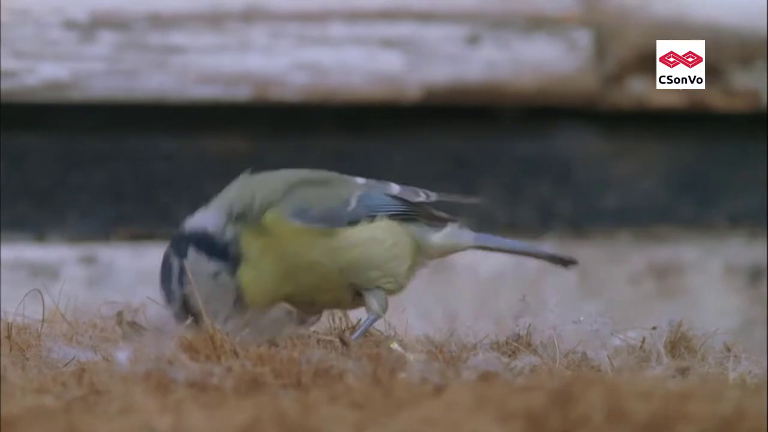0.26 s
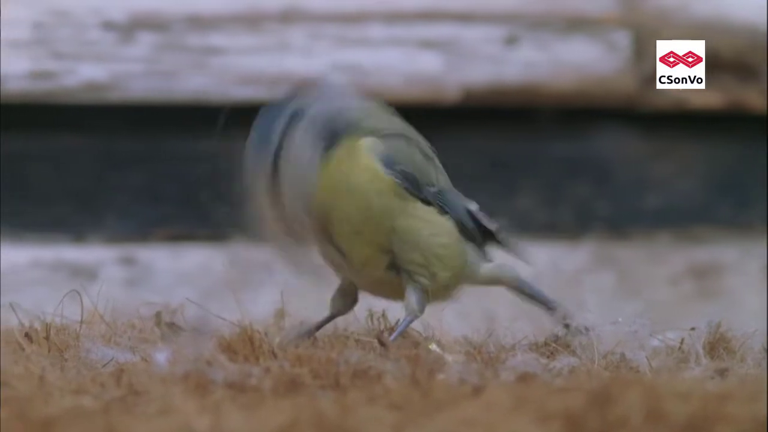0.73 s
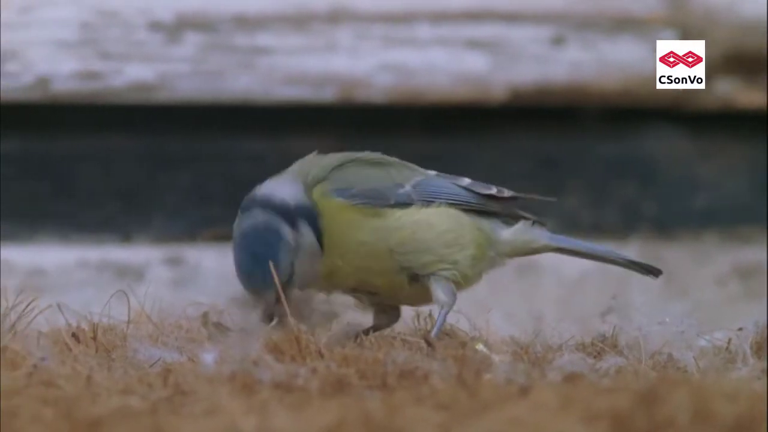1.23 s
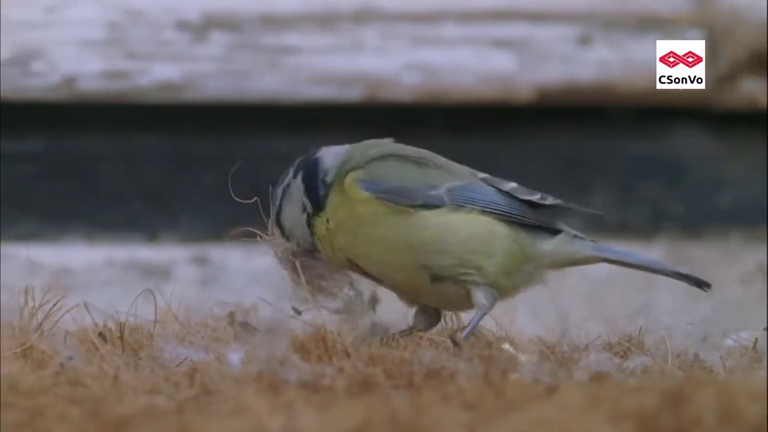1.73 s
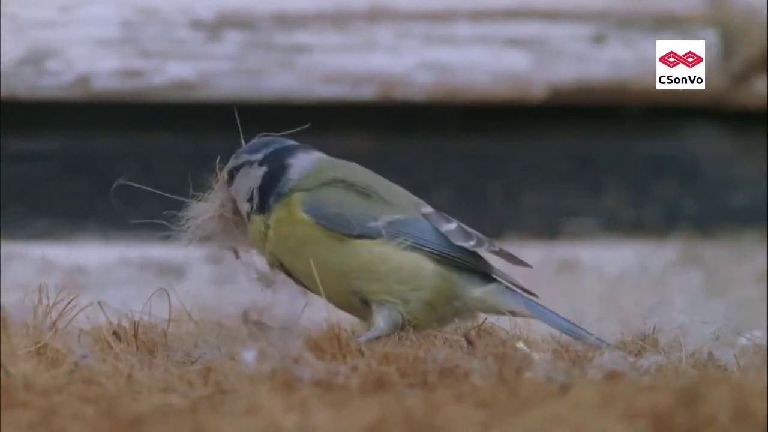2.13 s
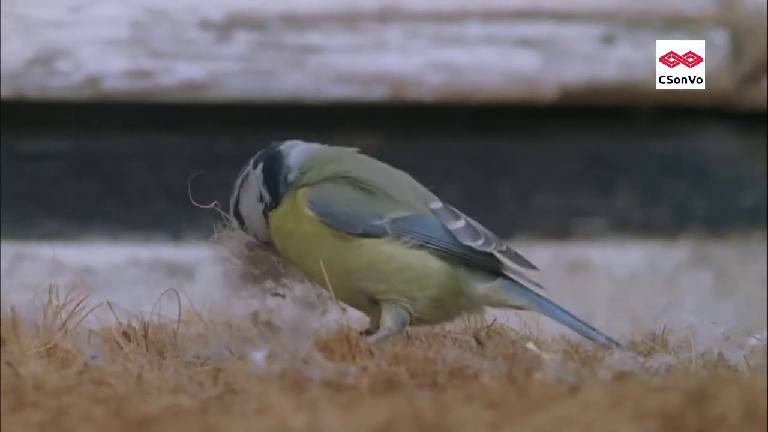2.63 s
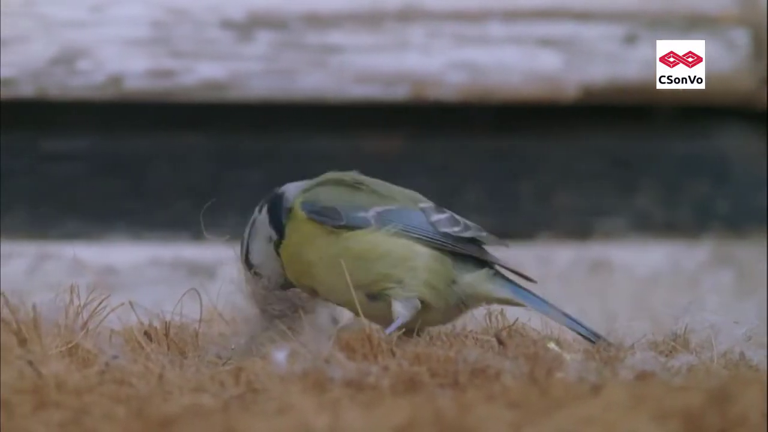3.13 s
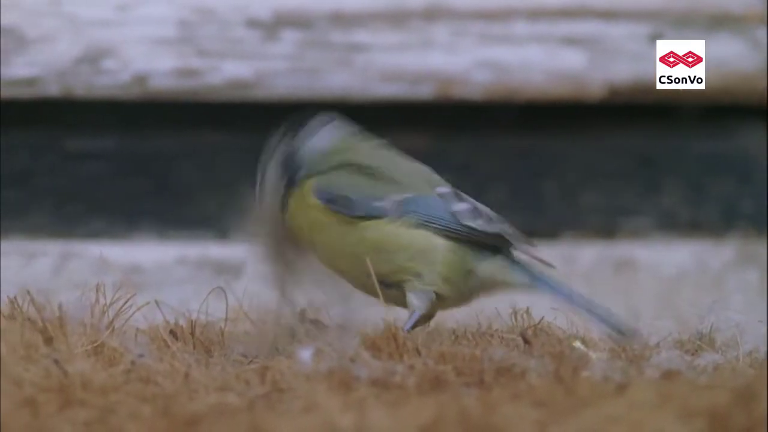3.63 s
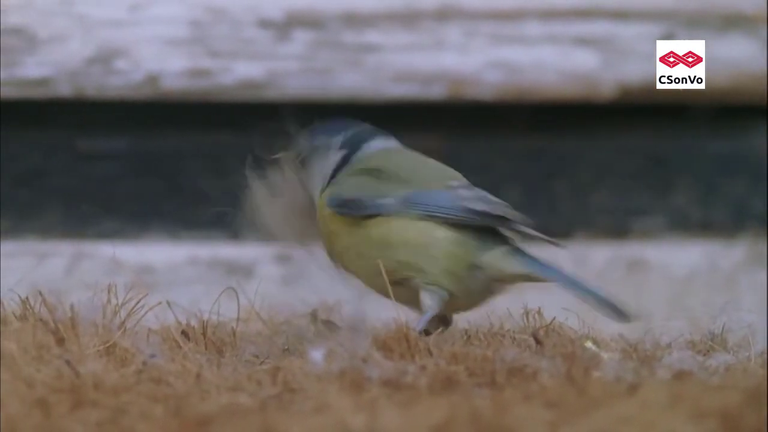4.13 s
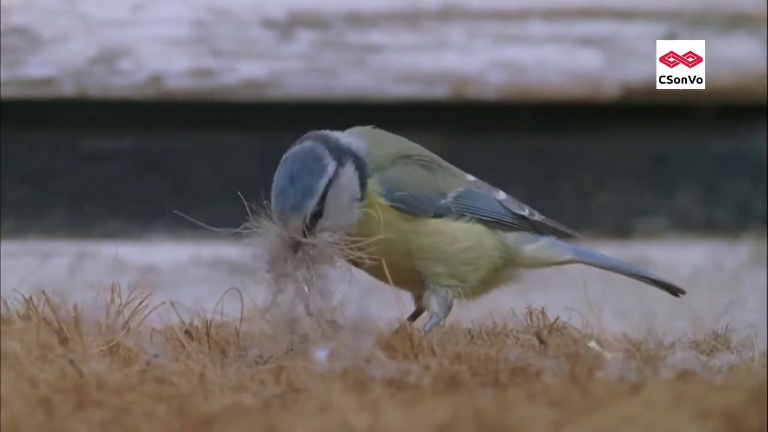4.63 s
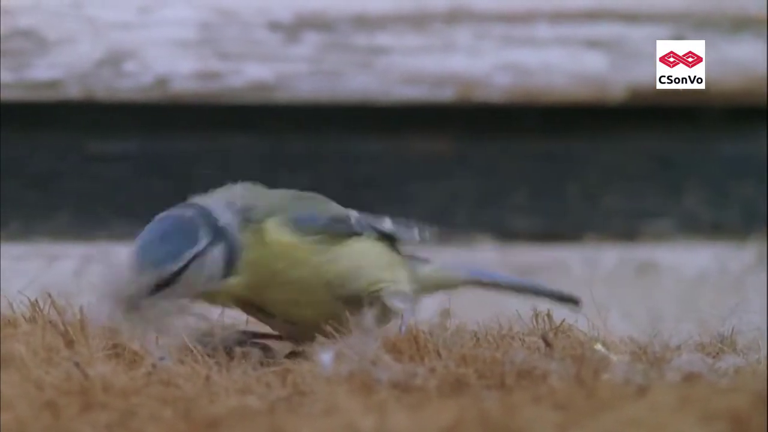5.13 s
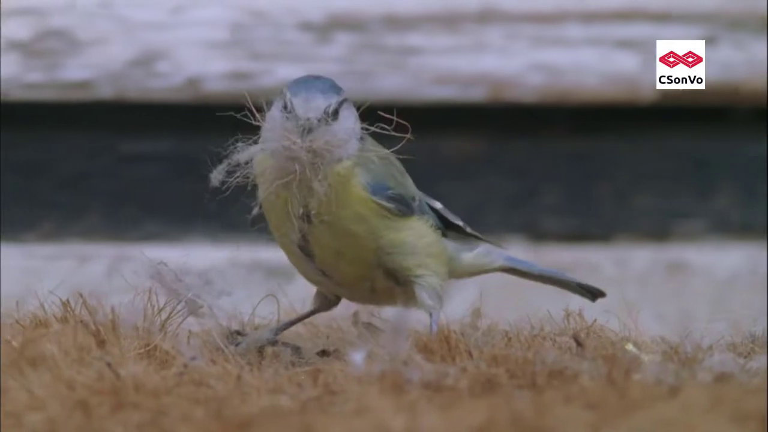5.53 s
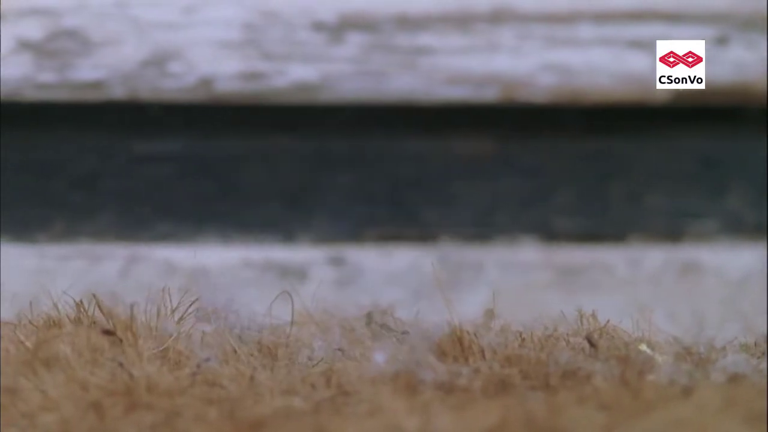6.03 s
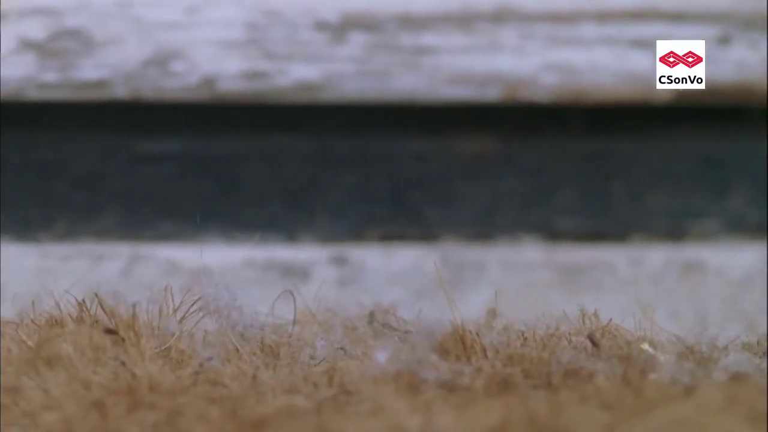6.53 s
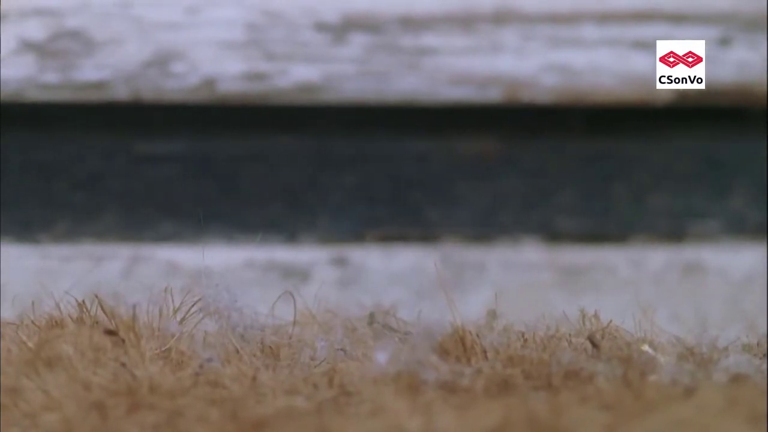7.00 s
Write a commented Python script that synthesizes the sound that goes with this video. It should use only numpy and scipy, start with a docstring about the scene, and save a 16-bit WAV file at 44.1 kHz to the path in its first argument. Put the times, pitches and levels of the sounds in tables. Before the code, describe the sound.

A close tit sings two phrases of clear paired whistles, high arched notes then lower sagging ones, over faint distant birdsong in a quiet garden.

```python
"""Garden: a tit close by sings two phrases of paired whistles, arched high notes, then sagging low ones.
Walls throw two echoes back. The whistles are near-pure gliding tones with weak harmonics.
Farther off a second tit see-saws and a small bird repeats falling sweeps (gliding sines), sparrows chirp
(harmonics through a beak resonance) and a bird rattles (pulsed noise); a blur of far birds lies behind.
A thin garden hiss, cut below 950 Hz, lies over the recorder's own low noise and hum."""
import sys
import numpy as np
from scipy import signal
from scipy.fft import rfft, irfft, next_fast_len
from scipy.io import wavfile
from scipy.ndimage import uniform_filter1d, map_coordinates

SR = 44100
rng = np.random.default_rng(int(sys.argv[2]) if len(sys.argv) > 2 else 0)


def materialize(psi):
    """Save the field psi as 16-bit PCM at rate SR to the path in sys.argv[1].

    A 1-D psi becomes a single channel; in a 2-D psi each row is a channel.
    """
    bounded = np.clip(np.atleast_2d(psi).T, -1, 1)
    quanta = np.round(bounded * 32767).astype(np.int16)
    wavfile.write(sys.argv[1], SR, quanta)


N = 320166
TIME = np.arange(N) / SR

# Pitch shapes of repeated far notes. Each row: time from the note's start in seconds, pitch in Hz.
# long falling sweep
SWEEP = [(0, 7166), (.012, 5766), (.035, 4394), (.065, 3610), (.085, 2950), (.095, 2926)]
# short falling note between sweeps
SLIDE = [(0, 6070), (.03, 5540), (.05, 5400)]
# hooked trill note, up then down
HOOK = [(0, 3727), (.017, 4550), (.03, 3800), (.048, 3144)]
# steep high fall
FLICK = [(0, 7500), (.022, 5320)]
# quick low fall
DROP = [(0, 3225), (.012, 2770), (.024, 2050)]
# Recorder noise spectrum. Each row: frequency in Hz, relative density in dB per Hz.
CIRCUIT = [(8, 14.5), (25, 6.5), (48, -15.5), (62, -5), (76, -8.5), (160, -12.5), (250, -14), (400, -13),
           (600, -20), (850, -23.5), (960, -24.5)]


def amp(db):
    """dB to gain."""
    return 10 ** (np.asarray(db) / 20)


def unit(x):
    """Scaled to rms 1."""
    return x / np.sqrt(np.mean(x ** 2) + 1e-20)


def wobble(rate, count=N):
    """Smooth random curve, rate knots a second."""
    knots = rng.standard_normal(int(count * rate / SR) + 4)
    return map_coordinates(knots, [np.arange(count) * rate / SR])


def filtered(x, response):
    """x times a response of frequency, padded against wrap-around."""
    m = next_fast_len(N + SR // 2)
    return irfft(rfft(x, m) * response(np.fft.rfftfreq(m, 1 / SR)), m)[..., :N]


def hiss(spectrum):
    """Noise of rms 1, its (Hz, dB) spectrum interpolated over log frequency."""
    f, db = np.transpose(spectrum)

    def response(hz):
        return amp(np.interp(np.log(hz + 1), np.log(f), db, -120, -120))

    return unit(filtered(rng.standard_normal(N), response))


def glide(points, smooth_s=0.0044):
    """First sample, pitch in Hz and phase along (s, Hz) points with rounded corners."""
    s, hz = np.transpose(points)
    t = np.arange(s[0], s[-1], 1 / SR)
    pitch = uniform_filter1d(np.interp(t, s, hz), int(smooth_s * SR) + 1, mode="nearest")
    phase = 2 * np.pi * (np.cumsum(pitch) / SR + rng.random())
    return round(s[0] * SR), pitch, phase


def add(track, start, sound):
    """Mix a sound in at a sample."""
    track[start:start + len(sound)] += sound[:max(N - start, 0)]


def swell(count, edge):
    """Rise and fall that together take a share of the length."""
    return signal.windows.tukey(count, np.clip(edge, 0, 1))


def tail(t60_s, start_s):
    """Scatter from leaves and walls: decaying noise of energy 1."""
    t = np.arange(int(t60_s * SR)) / SR
    h = rng.standard_normal(len(t)) * amp(-60 * t / t60_s) * (t > start_s)
    return h / np.linalg.norm(h)


# an arch starts RISE under its top and closes that gap exponentially; shares of pitch and of length
RISE, RISE_SHARE = .51, .07


def arch(s, length_s, top_hz):
    """(s, Hz) points of an arch: a quick rise, a crest, a droop that grows ever faster."""
    droop, droop_share = .125, .125  # pitch lost by the end, its time constant (shares)
    u = np.linspace(.03, 1, num=40)
    gap = RISE * np.exp(-u / RISE_SHARE) + droop * np.exp((u - 1) / droop_share)
    return np.transpose([s + u * length_s, top_hz * (1 - gap)])


def sung(start, pitch, phase, s, length_s, shares, levels_db):
    """Nearly pure whistle that opens from silence and shuts fast, with weak 2nd and 3rd harmonics."""
    count = len(pitch)
    share = (start / SR - s + np.arange(count) / SR) / length_s
    knots_db = [-41, *levels_db, levels_db[-1] - 3, levels_db[-1] - 14]
    db = uniform_filter1d(np.interp(share, [0, *shares, .96, 1], knots_db), 130, mode="nearest")
    phase = phase + .12 * wobble(260, count=count)  # the membrane's slight unsteadiness
    second = amp(-42.5 - (pitch - 4100) / 400) * np.sin(2 * phase)
    third = amp(-67) * np.sin(3 * phase)
    level = amp(db + .35 * wobble(130, count=count)) * swell(count, .03)
    return level * (np.sin(phase) + second + third)


def high_notes():
    """Arches: both sides of the syrinx overlap at the start and beat into a third, higher line."""
    # Each row: start in seconds, length in seconds, top in Hz, then level in dB on opening, at the crest,
    # on the droop, at the final swell.
    high = [(1.0024, .1058, 6360, -31.2, -26, -23.4, -19.9),
            (1.1859, .1023, 6270, -29.2, -23, -19.8, -17.4),
            (1.7085, .1033, 6390, -29.6, -28.6, -17.6, -14.8),
            (1.8938, .1053, 6300, -25.5, -18.6, -17.8, -14.6),
            (4.4476, .1033, 6350, -32.6, -33.2, -28.6, -22.4),
            (4.6287, .1039, 6290, -30.2, -26.9, -24.8, -18.3),
            (5.1449, .1035, 6330, -25.6, -22.1, -26.2, -18.9),
            (5.33, .1036, 6300, -28.3, -30.6, -24.2, -18.5)]
    # Shares of the length at which those four levels fall.
    arch_at = [.1, .4, .7, .88]
    # the side that opens first: aim and starting gap over the top, length as a share of the note
    lead_top, lead_rise, lead_share = 1.08, .39, .2
    song = np.zeros(N)
    for s, length_s, top_hz, *levels_db in high:
        start, pitch, phase = glide(arch(s, length_s, top_hz), smooth_s=0.0013)
        add(song, start, sung(start, pitch, phase, s + 0.00023, length_s - .0006, arch_at, levels_db))

        u = np.linspace(0, lead_share, num=12)
        lead_hz = top_hz * (lead_top - lead_rise * np.exp(-u / RISE_SHARE))
        first, lead, lead_phase = glide(np.transpose([s - .002 + u * length_s, lead_hz]), smooth_s=.001)
        lead_level = amp(levels_db[0] - 4) * swell(len(lead), 0.46)
        add(song, first, lead_level * np.sin(lead_phase))
        add(song, first, lead_level * amp(-28) * np.sin(2 * lead_phase))

        late = start - first
        both = len(lead) - late  # samples in which both sides sound
        lead_late, main = lead_phase[late:], phase[:both]
        higher_line = np.sin(2 * lead_late - main)
        # faint noisy treble at the note's start
        onset_smear = amp(-22) * wobble(6000, count=both) * np.sin(lead_late + main)
        add(song, start, amp(levels_db[0] - 17) * swell(both, .8) * (higher_line + onset_smear))
    return song


def low_notes():
    """Whistles whose pitch sags exponentially to rest and wavers slightly."""
    # Each row: start in seconds, length in seconds, starting pitch in Hz, resting pitch in Hz,
    # then level in dB on opening, at full voice, on closing.
    low = [(1.3462, .1111, 4470, 4040, -26.8, -21, -27.5), (1.5217, .0984, 4300, 4035, -26.6, -22.9, -25.3),
           (2.0646, .1079, 4470, 4035, -24.1, -19.8, -22.6),
           (2.2392, .1006, 4280, 4050, -33.7, -22.2, -25.3),
           (4.787, .1109, 4500, 4050, -24.3, -18.3, -21.3), (4.9586, .0989, 4320, 4030, -24.2, -19, -21.7),
           (5.4939, .1046, 4500, 4085, -24.6, -18.6, -23.1), (5.671, .0949, 4350, 4115, -34.6, -20, -21.4)]
    # Shares of the length: opening, full voice, end of the hold, closing.
    sag_at = [.1, .27, .7, .9]
    sag_s, waver_hz, hold_fade_db = .035, 30, .25  # waver_hz scales noise averaged over 3 points
    song = np.zeros(N)
    for s, length_s, begin_hz, rest_hz, open_db, full_db, close_db in low:
        t = np.linspace(0, length_s, num=30)
        waver = waver_hz * uniform_filter1d(rng.standard_normal(len(t)), size=3)
        hz = rest_hz + (begin_hz - rest_hz) * np.exp(-t / sag_s) + waver
        start, pitch, phase = glide(np.transpose([s + t, hz]))
        levels_db = [open_db, full_db, full_db - hold_fade_db, close_db]
        add(song, start, sung(start, pitch, phase, s, length_s, sag_at, levels_db))
    return song


def near_space(x):
    """Short scatter that favours the lower notes, a long faint tail and two dulled wall echoes."""
    # Wall echoes. Each row: delay in seconds, level in dB.
    walls = [(.188, -30), (.342, -37)]
    h = np.zeros(SR)
    add(h, 0, amp(-17.5) * signal.lfilter(*signal.butter(6, 4700, fs=SR), tail(.085, .008)))
    add(h, 0, amp(-27) * tail(0.063, 0.0024))
    add(h, 0, amp(-30.5) * tail(1.0, .004))
    for delay_s, db in walls:
        add(h, round(delay_s * SR), amp(db) * signal.firwin(9, 5200, fs=SR))
    return x + signal.fftconvolve(x, h)[:N]


def far_whistles():
    """Pure far notes; many paths through leaves make their level flutter."""
    # Levels in these tables are before a common 2 dB lift.
    # Far tits' level notes. Each row: start in seconds, length in seconds, starting pitch in Hz, level in dB.
    seesaw = [(.01, 0.13, 4343, -55.5), (0.055, 0.16, 4060, -64), (0.15, 0.15, 4420, -56.5),
              (0.256, 0.13, 4010, -65.5), (0.281, 0.35, 3232, -64.5), (0.617, 0.24, 4370, -57.5),
              (1.813, 0.079, 3100, -52), (2.18, .1, 3084, -51), (2.389, 0.067, 4290, -49),
              (2.519, 0.077, 3078, -50.5), (2.724, 0.1, 4330, -55), (2.861, 0.086, 3110, -49),
              (3.065, 0.085, 4210, -51.5), (3.192, 0.12, 3130, -57.5), (4.079, 0.47, 4110, -71.5),
              (5.463, 0.08, 3112, -49.5), (5.547, .14, 5100, -66), (5.829, 0.084, 3084, -49),
              (5.864, 0.15, 4305, -57.5), (6.029, 0.113, 4420, -52.5), (6.169, .088, 3100, -51),
              (6.358, 0.091, 4265, -51.5), (6.359, .2, 3287, -58.5), (6.41, .067, 3690, -68.5),
              (6.484, 0.12, 3134, -53.5), (6.645, 0.093, 4460, -55.5), (6.702, 0.078, 4220, -51),
              (6.794, .092, 4455, -52.5), (6.826, .12, 3095, -56), (6.896, 0.081, 3380, -59),
              (6.99, .09, 4480, -55.5), (7.034, 0.083, 4240, -51), (7.125, 0.12, 4480, -54),
              (7.177, 0.075, 3080, -55)]
    # Single glides. Each row: start in seconds, length in seconds, from Hz, to Hz, level in dB.
    whistles = [(1.158, .01, 3630, 7410, -61), (1.352, .009, 5430, 7640, -59.5),
                (1.361, 0.0092, 7940, 5300, -70), (3.462, 0.016, 6300, 3536, -60),
                (4.352, 0.039, 5900, 4720, -56.5), (5.258, .08, 2500, 3510, -69),
                (5.792, .02, 6730, 5600, -71), (5.821, 0.023, 4500, 7100, -63),
                (6.207, 0.022, 5000, 7830, -70), (6.319, 0.023, 7500, 5200, -75.5),
                (6.387, 0.015, 5000, 8180, -66), (6.41, 0.025, 6200, 4460, -81.5)]
    # Stepped falls. Each row: start of the fall in seconds, its length in seconds, from Hz, to Hz,
    # hold at the top before it in seconds, level in dB.
    steps = [(3.745, .025, 6100, 4500, .02, -72), (3.82, .095, 7350, 4630, .035, -69),
             (3.98, .085, 7250, 4000, .03, -68.5), (4.09, .125, 6200, 3470, .002, -62.5),
             (4.22, .14, 6330, 3640, .002, -63), (4.46, .06, 4700, 3440, .002, -60),
             (6.3, .06, 6100, 3000, .002, -63)]
    # Fall, shelf, plunge. Each row: share of the length, share of the fall.
    step = [(0, 0), (.4, .38), (.78, .5), (1, 1)]
    # A far tit's arches. Each row: start in seconds, length in seconds, top in Hz, level in dB.
    far_arches = [(0.397, 0.12, 6400, -67), (0.547, 0.22, 6320, -67.5), (0.812, .11, 6410, -61)]
    # Evenly paced repeats. Each row: pitch shape, first start in seconds, period in seconds, count,
    # mean level in dB.
    series = [(SWEEP, 1.78, .2, 1, -58), (SWEEP, 2.0, .1943, 8, -57.5), (SWEEP, 6.598, .342, 2, -66),
              (SLIDE, 2.06, .098, 9, -61), (HOOK, 3.484, .0806, 10, -62.5), (FLICK, .918, .02, 4, -63),
              (DROP, 6.48, .084, 10, -65), (DROP, 6.662, .023, 2, -68), (DROP, 7.008, .023, 2, -68)]
    slack_hz, slack = 2459, 0.0643  # a level note sinks by this share of its height over slack_hz
    calls = []
    for s, length_s, hz, db in seesaw:
        calls.append((db, [(s, hz), (s + length_s, hz - slack * (hz - slack_hz))]))
    for s, length_s, from_hz, to_hz, db in whistles:
        calls.append((db, [(s, from_hz), (s + length_s, to_hz)]))
    for s, length_s, from_hz, to_hz, held_s, db in steps:
        fall = [(s + u * length_s, from_hz + v * (to_hz - from_hz)) for u, v in step]
        calls.append((db, [(s - held_s, from_hz)] + fall))
    for s, length_s, top_hz, db in far_arches:
        calls.append((db, arch(s, length_s, top_hz)[4:]))  # without the first of the rise
    for shape, first_s, period_s, many, db in series:
        for k in range(round(many)):
            points = [(first_s + k * period_s + u, hz) for u, hz in shape]
            calls.append((db + rng.normal(0, 1.9), points))
    out = np.zeros(N)
    for db, points in calls:
        start, pitch, phase = glide(points, smooth_s=0.002)
        flutter = amp(db + 2 + 3 * wobble(55, count=len(pitch)))
        add(out, start, flutter * swell(len(pitch), .3) * np.sin(phase))
    return out


def twitter():
    """Raspy bursts: eight tiny falling sines in quick succession, at scattered pitch."""
    # Each row: start in seconds, length in seconds, from Hz, to Hz (both before the scatter), level in dB.
    bursts = [(.24, 0.16, 5440, 4730, -57.5), (5.81, .07, 3800, 2180, -52), (5.96, .06, 6000, 3860, -55),
              (6.02, .05, 6000, 3980, -54.5), (6.07, .06, 6000, 4200, -55), (6.22, .2, 3500, 2300, -55),
              (6.73, 0.076, 5350, 4680, -55), (7.075, .053, 5280, 4900, -55)]
    out = np.zeros(N)
    for s, length_s, from_hz, to_hz, db in bursts:
        for k, (late, high) in enumerate(rng.random((8, 2))):
            when = s + length_s * (k + late) / 8
            shift = 1 + 0.098 * (high - .5)
            points = [(when, from_hz * shift), (when + .011, to_hz * shift)]
            start, pitch, phase = glide(points, smooth_s=.002)
            add(out, start, amp(db) * swell(len(pitch), 1.0) * np.sin(phase))
    return out


def sparrows():
    """Harmonic chirps that glide and bend, loudest where a harmonic crosses the beak resonance."""
    # Each row: start in seconds, length in seconds, from Hz, to Hz, bend in Hz, number of bends,
    # beak resonance in Hz, level in dB.
    chirps = [(.72, .037, 1250, 1480, 0, 1, 2700, -60), (.755, .037, 1700, 1500, 230, 1, 3000, -54),
              (.83, .032, 1200, 1550, 0, 1, 2800, -58), (.86, .045, 1800, 1400, 450, 1, 3800, -54),
              (.9, .042, 4100, 2000, 300, 1, 3000, -59), (3.122, .1, 1950, 3050, -260, 8, 2800, -57),
              (3.305, .08, 1680, 1580, 150, 4, 5400, -56), (3.42, .08, 1050, 1250, 350, 1, 2500, -61),
              (3.55, .09, 1100, 1750, 200, 2, 2800, -60), (5.8, .05, 3300, 3500, -1100, 1, 2800, -56),
              (5.934, .02, 3050, 2500, 0, 1, 4300, -54), (5.952, .158, 2400, 2600, -320, 6.9, 4700, -50),
              (6.2, .15, 1500, 2000, 950, 1, 2300, -60), (6.4, .06, 3000, 1850, -300, 1, 2500, -60)]
    skew = .3  # bends come slowly and snap back
    out, u = np.zeros(N), np.linspace(0, 1, num=60)
    for s, length_s, from_hz, to_hz, bend_hz, bends, beak_hz, db in chirps:
        bend = np.sin(np.pi * bends * u) - skew * np.sin(2 * np.pi * bends * u)
        hz = from_hz + (to_hz - from_hz) * u + bend_hz * bend
        start, pitch, phase = glide(np.transpose([s + u * length_s, hz]), smooth_s=.002)
        count = len(pitch)
        stack = np.zeros(count)
        for k in range(1, 7):
            beak_db = -20 * np.log2(k * pitch / beak_hz) ** 2
            top_loss_db = np.clip(k * pitch - 7600, 0, None) / 60
            stack += amp(beak_db - top_loss_db) * np.sin(k * phase)
        rasp = 1 + .35 * wobble(830, count=count)
        level = amp(db + 2.5 * wobble(70, count=count)) * swell(count, .3)
        add(out, start, level * rasp * stack)
    return out


def rattles():
    """Harsh band noise, pulsed 42 times a second at uneven strength."""
    # Each row: start in seconds, length in seconds, rms level in dB before edges and dulling,
    # top of the band in Hz.
    bursts = [(.135, .13, -57, 6100), (.74, .06, -64, 5900), (.85, .1, -64, 5100), (1.16, .04, -59, 3600),
              (1.285, .03, -54, 3600), (2.1, .13, -56, 5400), (2.29, .11, -58, 6100),
              (2.515, .12, -58, 6500), (3.17, .07, -60, 6700), (3.43, .08, -63, 6000),
              (4.305, .09, -54, 3250), (4.468, .07, -53, 3250), (4.555, .025, -58, 3900),
              (4.78, .13, -56, 4900), (4.97, .12, -56, 4900), (5.255, .03, -59, 3600),
              (5.31, .02, -60, 3900), (5.82, .07, -57, 5600)]
    low_hz, pulses_hz = 1990, 42
    out = np.zeros(N)
    for s, length_s, db, top_hz in bursts:
        t = np.arange(int(length_s * SR)) / SR
        pulses = np.cos(np.pi * pulses_hz * (t - .018)) ** 10
        beats = 0.72 + amp(3.5 * wobble(59, count=len(t))) * pulses
        band = signal.butter(2, [low_hz, top_hz], "bandpass", fs=SR)
        noise = signal.lfilter(*band, rng.standard_normal(len(t)))
        add(out, round(s * SR), amp(db) * unit(noise * beats) * swell(len(t), 0.21))
    return signal.lfilter(*signal.butter(3, 7000, fs=SR), out)  # air and leaves dull the top


def chorus(count=700):
    """Many far birds: short random falling glides, smeared by a long tail, evened to a set level."""
    # Each row: time in seconds, level in dB.
    levels = [(0, -61.5), (.6, -65.5), (.9, -57), (2.4, -63.5), (3.3, -65), (3.7, -78), (4.2, -72.5),
              (4.6, -61.5), (5.8, -61), (6.4, -61), (7.26, -64)]
    out = np.zeros(N)
    for when, pitch, fall, length, size in rng.random((count, 5)):
        hz, s = 2600 * 2 ** (1.25 * pitch), when * N / SR
        points = [(s, hz * (1.05 + .15 * fall)), (s + .015 + .04 * length, hz * (.95 - .1 * fall))]
        start, track, phase = glide(points)
        level = amp(8 * size - 14 * np.log2(hz / 4300) ** 2)
        add(out, start, level * swell(len(track), .6) * np.sin(phase))
    # circular convolution: the tail of earlier notes is there from the start
    smear = irfft(rfft(out) * rfft(tail(.4, .003), N), N)
    blur = amp(-11) * out + smear
    blur /= np.sqrt(np.abs(uniform_filter1d(blur ** 2, SR // 3)) + 1e-9)
    return amp(np.interp(TIME, *np.transpose(levels))) * blur


def garden():
    """Thin air hiss, patchy in time and pitch."""
    # Each row: frequency in Hz, relative density in dB per Hz.
    spectrum = [(900, 4), (1100, 1.5), (2000, 0.5), (3000, -0.5), (5000, -22), (6500, -7), (8000, -9.5),
                (11000, -14), (15500, -35.5)]
    z = signal.stft(hiss(spectrum), nperseg=512)[2]
    field = uniform_filter1d(uniform_filter1d(rng.standard_normal(z.shape), 4, 0), 8, 1)
    patchy = signal.istft(z * amp(3.2 * unit(field)), nperseg=512)[1][:N]
    return amp(-71.3 + .5 * wobble(4)) * unit(patchy)


def background():
    """Recorder noise and mains hum, both slowly wavering in level."""
    # Each row: frequency in Hz, mean peak level in dB.
    hum_lines = [(62, -84.5), (100, -91.5), (200, -92.5), (300, -99), (400, -99)]
    hum = sum(amp(db + wobble(8)) * np.sin(2 * np.pi * hz * TIME) for hz, db in hum_lines)
    return amp(-73 + 0.5 * wobble(6.8)) * hiss(CIRCUIT) + hum


def scene():
    """One microphone on both channels, with a trace of difference."""
    far, hedge = far_whistles() + twitter(), sparrows() + rattles()
    far += amp(-5) * signal.fftconvolve(far, tail(.55, .004))[:N]
    far += hedge + amp(-11) * signal.fftconvolve(hedge, tail(.25, .004))[:N]  # nearer callers: drier
    mono = near_space(high_notes() + low_notes()) + far + chorus() + garden()
    side_hiss = hiss([(900, -8.0), (5000, -11), (9000, -10.0), (15000, -11)])
    side = amp(-59.5 + 3.4 * wobble(20)) * mono + amp(-85.0) * side_hiss
    return np.array([mono + side, mono - side])


def record(dry):
    """Faint thin lines shifted by multiples of SR/8 above and below each note; low cut, noise, band limit."""
    # Each row: multiple of spacing_hz, level of each shifted line in dB.
    image_lines = [(1, -50.5), (2, -48.5), (3, -56)]
    spacing_hz, low_cut_hz, top_hz = SR / 8, 950, 15600
    images = 1 + sum(2 * amp(db) * np.cos(2 * np.pi * k * spacing_hz * TIME) for k, db in image_lines)
    own, apart = background(), amp(-105) * hiss(CIRCUIT)
    cut = filtered(dry * images, lambda hz: hz > low_cut_hz)
    noisy = cut + [own + apart, own - apart]
    return filtered(noisy, lambda hz: hz < top_hz)


dry = scene()
out = record(dry)
materialize(out)
```